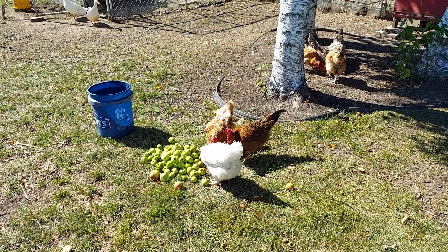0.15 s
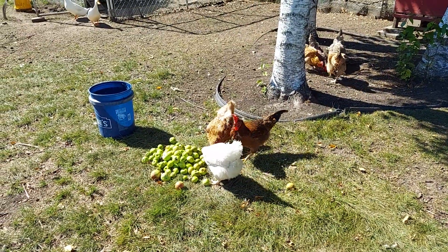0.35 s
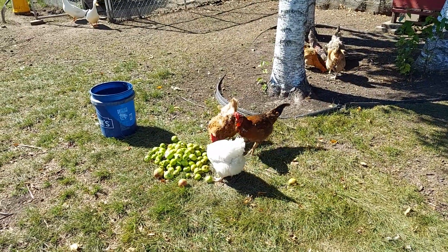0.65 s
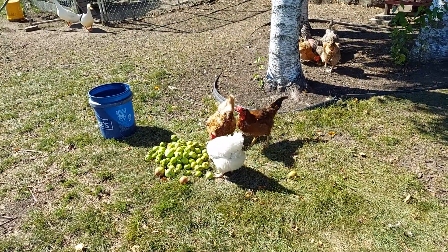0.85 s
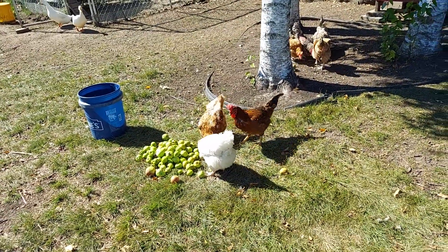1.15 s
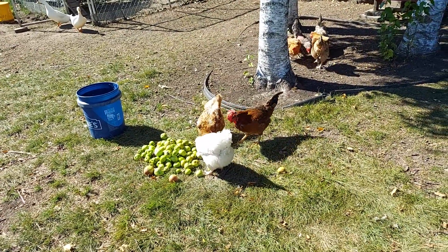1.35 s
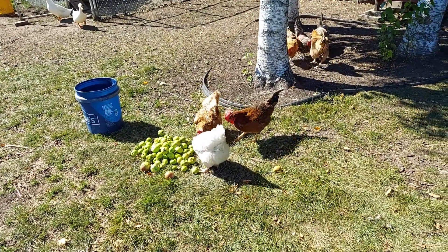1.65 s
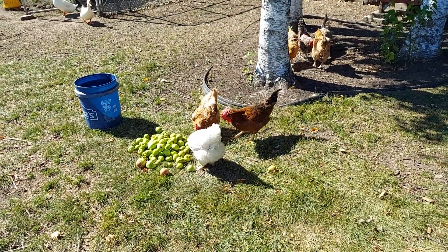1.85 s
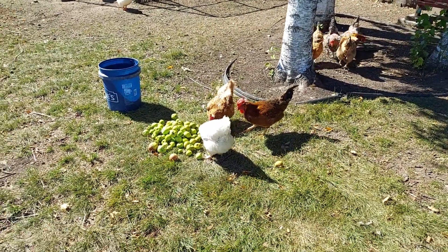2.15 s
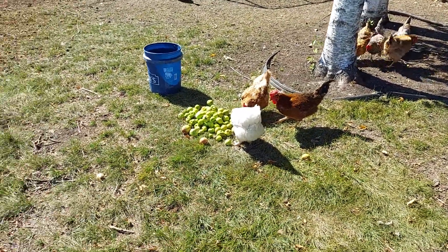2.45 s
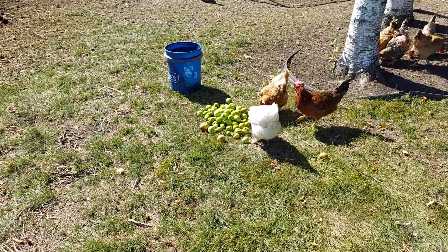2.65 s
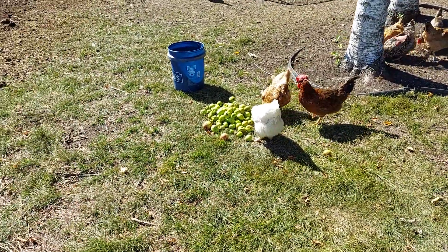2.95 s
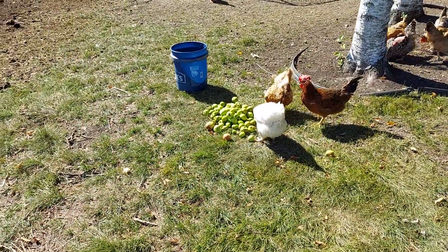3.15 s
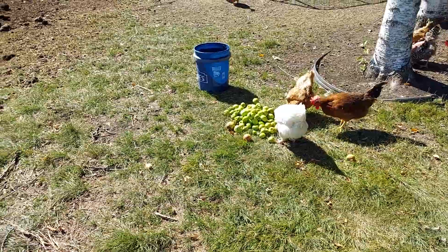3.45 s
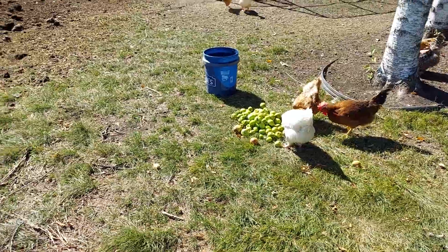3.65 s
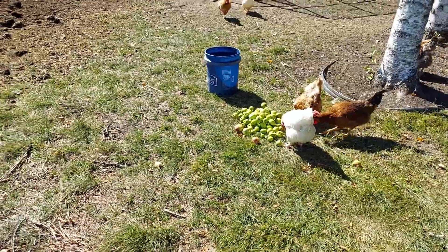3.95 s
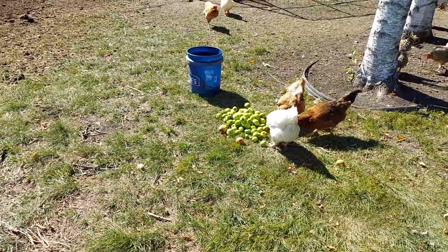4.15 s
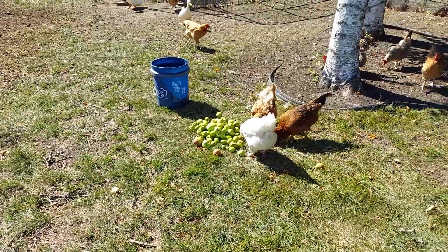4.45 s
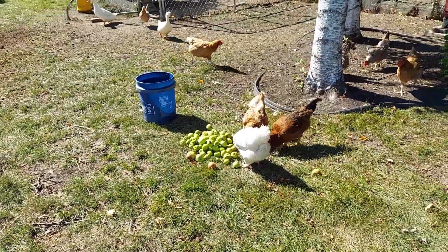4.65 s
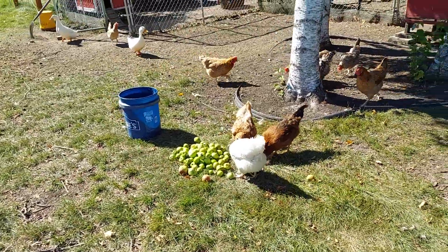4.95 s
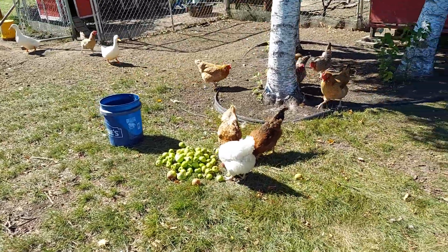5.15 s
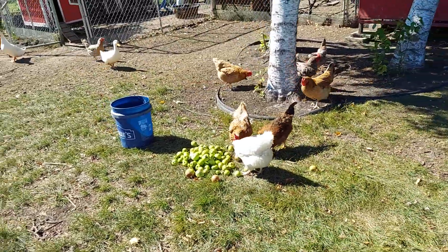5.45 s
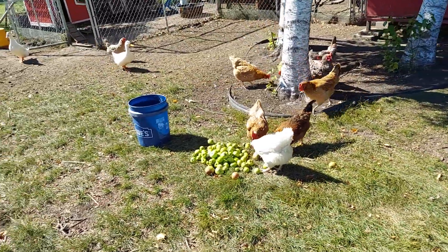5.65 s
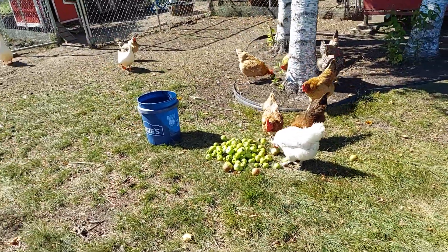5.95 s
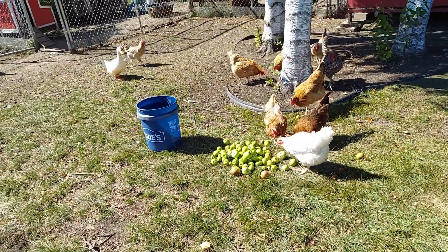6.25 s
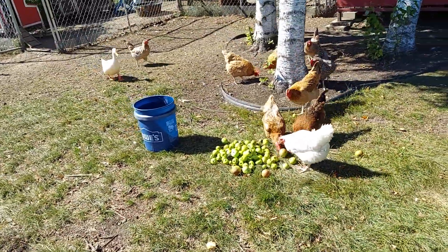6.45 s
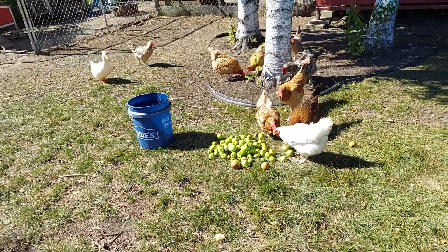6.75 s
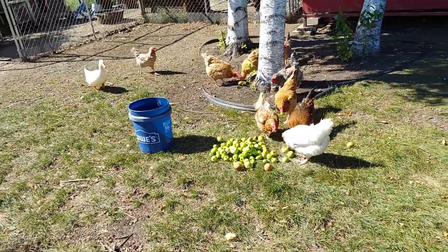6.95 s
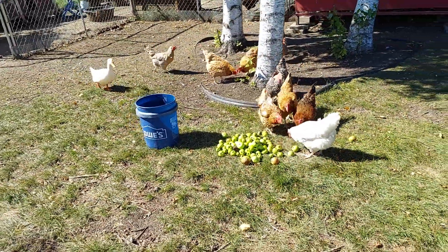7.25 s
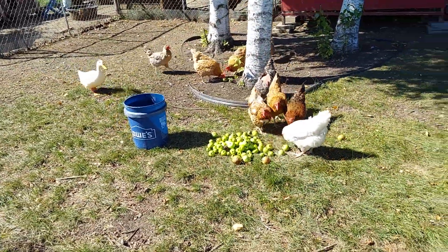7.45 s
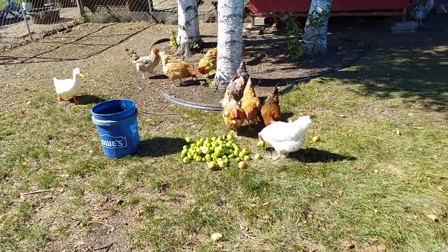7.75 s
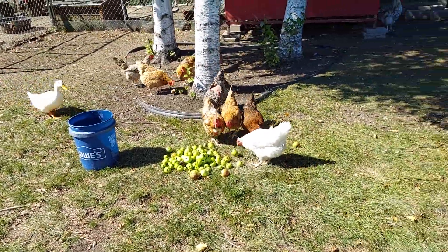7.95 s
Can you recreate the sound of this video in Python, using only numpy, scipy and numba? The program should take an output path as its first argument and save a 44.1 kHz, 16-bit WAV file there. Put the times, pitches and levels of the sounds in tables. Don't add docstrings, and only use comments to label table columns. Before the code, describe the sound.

Backyard poultry: a rooster's crow breaks off, wire fence rattles, then pecking, scratching and a drake's rough, wheezy quacks amid insects and faint traffic.

```python
import sys
import numpy as np
from scipy import signal
from scipy.fft import rfft, irfft, next_fast_len
from scipy.io import wavfile
from scipy.ndimage import map_coordinates
from numba import njit

SR = 44100
rng = np.random.default_rng(int(sys.argv[2]) if len(sys.argv) > 2 else 0)


def transcribe(u):
    v = np.clip(np.atleast_2d(u).T, -1, 1)
    q = np.round(v * 32767).astype(np.int16)
    wavfile.write(sys.argv[1], SR, q)


def attenuation_scalar(level_db):
    decades = np.asarray(level_db, float) / 20
    return 10 ** decades


N = 357430
T = np.arange(N) / SR


def unit(x):
    return x / np.sqrt(np.mean(x ** 2) + 1e-20)


def along(points, hz):
    f, v = np.transpose(points)
    return np.interp(np.log(hz + 1), np.log(f + 1), v)


def curves(rows):
    s, *cols = np.transpose(rows)
    return [np.interp(T, s, c) for c in cols]


def wobble(rate):
    knots = rng.standard_normal(int(N * rate / SR) + 4)
    return map_coordinates(knots, [T * rate])


def filtered(x, response):
    m = next_fast_len(N + 8192)
    return irfft(rfft(x, m) * response(np.fft.rfftfreq(m, 1 / SR)), m)[..., :N]


def modes(table):
    def response(f):
        total = 0
        for k, (hz, width_hz, db) in enumerate(table):
            damping = 1j * f * width_hz
            total = total + (-1) ** k * attenuation_scalar(db) * damping / (hz * hz - f * f + damping)
        return total
    return response


def rush(spectrum, alike, grain_db=0):
    z = rng.standard_normal((2, N)) * attenuation_scalar(grain_db * wobble(900))
    closed = [(spectrum[0][0] / 2, -60)] + list(spectrum) + [(spectrum[-1][0] * 2, -60)]
    mid, side = filtered(z, lambda hz: attenuation_scalar(along(closed, hz)))
    turn = np.arccos(np.clip(alike, -1, 1)) / 2
    mid, side = np.cos(turn) * mid, np.sin(turn) * side
    return unit(np.array([mid + side, mid - side]))


def leaning(left_over_right_db):
    return np.array([[.5], [-.5]]) * left_over_right_db


def placed(x, lead_ms, pan_db):
    shift = lead_ms * SR / 2000
    ears = [map_coordinates(x, [np.arange(N) + side * shift], order=3) * attenuation_scalar(side * pan_db / 2)
            for side in (1, -1)]
    return np.array(ears)


def add(track, s, sound):
    part = track[..., round(s * SR):][..., :sound.shape[-1]]
    part += sound[..., :part.shape[-1]]


# frequency in Hz, time to fall 60 dB in seconds.
YARD_DECAY = [(300, 0.32), (2000, 0.14), (8000, 0.078)]


def yard(x):
    hz, t, z = signal.stft(rng.standard_normal((2, SR // 2)), SR, nperseg=256)
    decay = attenuation_scalar(-60 * t / along(YARD_DECAY, hz)[:, None])
    tail = signal.istft(z * decay, SR, nperseg=256)[1]
    late = np.pad(x, (300, 0))[None]
    return signal.fftconvolve(late, tail / np.linalg.norm(tail[0]), axes=1)[:, :N]


@njit
def ring(x, turn, keep):
    y = np.zeros(len(x))
    for i in range(2, len(x)):
        y[i] = x[i] - x[i - 2] + 2 * keep * np.cos(turn[i]) * y[i - 1] - keep * keep * y[i - 2]
    return y


def resonate(x, hz, width_hz):
    for spread in (1, 2, 2):
        x = ring(x, 2 * np.pi * hz / SR, np.exp(-np.pi * spread * width_hz / SR))
    return unit(x)


def quack(s, length, db, top_hz, soft_db):
    t = np.linspace(0, length, 24)
    effort = np.sin(np.pi / 2 * np.clip(t / (0.75 * length), 0, 1)) ** 2
    start = np.clip(1 - t / 0.075, 0, 1)
    end = np.clip(1 - (length - t) / 0.049, 0, 1)
    level_db = db - 10 * (1 - effort) - 9.5 * start - 16.5 * end
    rate_hz = top_hz - 23 * (1 - effort)
    opening = 0.68 * np.clip(t / (0.85 * length), 0, 1) ** 0.75 * (1 - 0.3 * end)
    bill_shut = np.clip(1 - t / 0.052, 0, 1) ** 0.38
    bill_db = soft_db + (-2.5 - soft_db) * effort ** 2.5 - 22 * end - 20 * bill_shut
    return list(zip(s + t, level_db, rate_hz, opening, bill_db))


def grunt(s, length, db, opening, bill_db):
    rate_hz = 59.13 + 85 * length
    shape = ((-.12, -15.5, 0.25, -2), (.25, 3.5, 0.91, -1.5), (.7, 0.5, 1, -1.5), (1, -41, 0.38, -5))
    return [(s + part * length, db + drop_db, rate_hz, opening * wide, bill_db + shut_db)
            for part, drop_db, wide, shut_db in shape]


# start in seconds, length in seconds, level in dB, throat opening 0-1, bill band in dB.
DRAKE_GRUNTS = [(2.465, .057, -60, 0.42, -33), (2.707, 0.076, -56.5, 0.47, -8),
                (2.875, 0.093, -61.5, 0.42, -4.5), (3.142, 0.09, -55.5, 0.48, -0.5),
                (3.35, 0.065, -58.5, 0.28, -0.5), (3.589, 0.09, -55, 0.28, 0.5),
                (3.925, .11, -58.5, 0.32, -3), (4.08, 0.29, -56, 0.3, -1), (4.487, 0.077, -57, 0.37, -9),
                (4.705, 0.1, -52, 0.54, -6), (5.13, 0.065, -52.5, 0.49, -8),
                (5.634, 0.11, -49.5, 0.49, -21), (6.124, .09, -47, 0.51, -18),
                (6.255, 0.12, -55.5, 0.26, -7), (6.803, .016, -51, 0.52, -17),
                (6.911, 0.069, -50.5, 0.31, -4.5), (7.114, 0.16, -71, 0.83, 0),
                (7.447, 0.073, -57, 0.06, -8.5)]
# start in seconds, length in seconds, top level in dB, top pulse rate in Hz,
# bill band at the start in dB.
DRAKE_CALLS = [
    (5.254, 0.35, -44, 98, -3),
    (6.39, 0.34, -40.5, 98.35, -2.5),
    (7.549, .42, -44, 93.04, -9),
]
# Hz when closed, Hz when open, width in Hz.
DRAKE_THROAT = [
    (1296, 1600, 164),
    (1502, 1943, 235),
    (1644, 2172, 154),
]
# frequency in Hz, width in Hz, level in dB.
DRAKE_HISS = [(2660, 300, 0), (3520, 330, -2), (3950, 400, -1), (4600, 1000, -3.5)]
# time in seconds, left lead in ms, left over right in dB.
DRAKE_WALK = [
    (2.5, 0.0096, -5.5),
    (4.7, 0.12, -4.5),
    (5.4, 0.32, -8),
    (6.5, 0.32, -6.5),
    (7.8, 0.34, -9.5),
]


def drake():
    calls = sorted([grunt(*row) for row in DRAKE_GRUNTS] + [quack(*row) for row in DRAKE_CALLS])
    level_db, rate, opening, bill_db = curves([row for call in calls for row in call])
    sounding = sum(np.interp(T, [c[0][0] - .004, c[0][0], c[-1][0], c[-1][0] + 0.0034], [0, 1, 1, 0])
                   for c in calls)

    cycle = np.cumsum(rate * (1 + .028 * wobble(60))) / SR
    snap = np.diff(np.floor(cycle), prepend=0) * attenuation_scalar(2.3 * wobble(80))
    rasp = unit(rng.standard_normal(N) * np.exp(1.1 * np.cos(2 * np.pi * (cycle - .15))))
    puffs = unit(snap + .35 * np.roll(snap, round(.0031 * SR))) + .6 * rasp

    bands = []
    for (closed_hz, open_hz, width_hz), curve, wander in zip(DRAKE_THROAT, (1, 1, .2), (.02, .022, .006)):
        hz = closed_hz + (open_hz - closed_hz) * opening.clip(0) ** curve
        bands.append(resonate(puffs, hz * (1 + wander * wobble(22)), width_hz))
    low, middle, bill = bands
    middle, bill = np.roll(middle, round(.0012 * SR)), np.roll(bill, round(.003 * SR))

    hiss_shape = lambda f: modes(DRAKE_HISS)(f) ** 2 * np.abs(np.tanh((f - 3050) / 260))
    hiss = attenuation_scalar(bill_db - 20.5 + 13.7 * opening) * unit(filtered(rasp, hiss_shape))

    gain = attenuation_scalar(level_db + 6.0) * sounding
    rest = np.sqrt(np.clip(1 - attenuation_scalar(2 * bill_db), .15, 1))
    throat = gain * rest * (attenuation_scalar(2.5 - 13.2 * opening) * low - middle)
    beak = gain * (attenuation_scalar(bill_db) * bill + hiss)
    lead_ms, pan_db = curves(DRAKE_WALK)
    direct = placed(throat, lead_ms, pan_db) + placed(beak, lead_ms + .065, pan_db)
    return direct + attenuation_scalar(-13.5) * yard(throat + beak)


# time in seconds, pitch in Hz, level in dB.
CROW_FALL = [
    (0, 670, -39.5),
    (.05, 662.4, -34.5),
    (.09, 651, -32.5),
    (.122, 630, -36),
    (.15, 616, -35.5),
    (.18, 571, -41),
    (.23, 502, -47),
]
# multiple of the pitch, level in dB, slope in dB per second.
CROW_HARMONICS = [(1, -3, 8), (2, 2, -48), (3, -42, 140), (4, -25.5, -67), (6, -32, -20)]


def rooster():
    hz, db = curves(CROW_FALL)
    crack = np.interp(T, [.15, .2], [.004, .07])
    phase = 2 * np.pi * np.cumsum(hz * (1 + crack * wobble(151.6))) / SR
    tone = np.zeros(N)
    for k, level, slope_db in CROW_HARMONICS:
        harmonic_db = level + slope_db * T.clip(0, .25) + 0.35 * k * wobble(73.5)
        tone += np.sqrt(2) * attenuation_scalar(harmonic_db) * np.sin(k * phase)
    throat = modes([(296, 85, 3.5), (1140, 600, 1.0), (1790, 440, -5.5), (2880, 180, -7.5)])
    croak = unit(filtered(rng.standard_normal(N), throat))
    voice = tone + np.interp(T, [.13, .19], [.05, .6]) * croak
    voice = voice * attenuation_scalar(db) * np.interp(T, [.21, .24], [1, 0])
    return placed(voice, -0.44, -3.5) + attenuation_scalar(-9.0) * yard(voice)


# start in seconds, length in seconds, pitch in Hz, glide as a share of pitch, level in dB.
HEN_CLUCKS = [(0.176, 0.031, 416, 0.027, -56.5), (0.381, 0.046, 421, 0.14, -63.5),
              (0.482, 0.031, 426, -0.39, -66), (4.731, 0.047, 418, 0.22, -64),
              (4.735, 0.0443, 681, -0.237, -57.5), (4.74, .04, 1120, -.2, -66),
              (4.865, .03, 520, -.15, -67), (6.935, .02, 620, -.4, -60), (5.518, 0.051, 229.2, -0.46, -60)]
# start in seconds, length in seconds, pitch in
# Hz, level in dB, overtone level in dB.
HEN_COOS = [(0.21, 0.021, 1315, -59.5, -35), (0.307, 0.2, 1003, -67, -18), (0.591, 0.052, 650, -71, -9),
            (1.16, 1, 444.6, -76, -6), (2.429, 0.32, 260, -73, -5.5), (2.8, 0.82, 437, -78, -1),
            (3.06, 0.0077, 357, -60, -5), (3.999, 1.74, 440.4, -75.5, -7), (5.8, 0.25, 72.15, -60, -10),
            (6.579, 0.038, 248.6, -66, -2), (7.815, 0.027, 628.5, -61, 2.5)]


def hens():
    out, flutter = np.zeros(N), wobble(90)
    notes = [(*row, -10) for row in HEN_CLUCKS]
    notes += [(s, length, hz, 0, db, over_db) for s, length, hz, db, over_db in HEN_COOS]
    for s, length, hz, glide, db, over_db in notes:
        u = np.linspace(0, 1, round(length * SR))
        bend = 1 + glide * u + .035 * flutter[round(s * SR):][:len(u)]
        phase = 2 * np.pi * np.cumsum(hz * bend) / SR
        swell = np.sqrt(np.sin(np.pi * u).clip(0))
        add(out, s, attenuation_scalar(db + 16) * swell * (np.sin(phase) + attenuation_scalar(over_db) * np.sin(2 * phase)))
    return placed(out, 0, -0.61) + attenuation_scalar(-7.5) * yard(out)


# start in seconds, length in seconds, Hz at the start, Hz at the
# end, level in dB.
DUCK_SQUAWKS = [(3.915, .03, 2330, 2260, -50), (3.925, .03, 1350, 1400, -56), (3.952, .022, 1750, 1850, -50),
                (3.965, 0.042, 2180, 2730, -50), (4.05, 0.026, 2090, 2250, -61),
                (4.08, 0.044, 2040, 2650, -53.5), (4.16, .02, 2200, 2500, -58)]


def yelps():
    out, breath = np.zeros(N), rng.standard_normal(N) * attenuation_scalar(4.6 * wobble(140))
    for s, length, from_hz, to_hz, db in DUCK_SQUAWKS:
        u = np.linspace(0, 1, round(length * SR))
        note = resonate(breath[round(s * SR):][:len(u)], from_hz + (to_hz - from_hz) * u, 263)
        add(out, s, attenuation_scalar(db) * np.sqrt(np.sin(np.pi * u ** 0.51).clip(0)) * note)
    return placed(out, -0.43, -1) + attenuation_scalar(-1.0) * yard(out)


# time in seconds, level in dB, time to fall 60 dB in seconds, brightness in dB.
FENCE_BUMPS = [
    (1.86, -43.5, 0.79, 4),
    (2.53, -46, 0.36, -5.5),
    (2.65, -52, 1, -2.5),
    (3.172, -54.5, 0.91, -8.5),
    (3.918, -49.5, 1, -12.5),
]
# frequency in Hz, width in Hz, level in dB.
FENCE_WIRE = [(1570, 330, -4), (2056, 350, 14), (4220, 660, 1), (4840, 800, -5.5), (7000, 1560, -4.5),
              (8140, 1700, -5), (12700, 2100, -11.5)]


def fence():
    t = np.arange(SR) / SR
    rise = 1 - np.exp(-t / 0.00043)
    slow, middle, quick = np.zeros((3, N))
    for s, db, t60, bright_db in FENCE_BUMPS:
        add(slow, s, attenuation_scalar(db - 60 * t / t60) * rise)
        add(middle, s, attenuation_scalar(db + bright_db - 60 * t / (0.86 * t60)) * rise)
        add(quick, s, attenuation_scalar(db + bright_db - 60 * t / (0.27 * t60)) * rise)
    strands = rng.standard_normal(800)

    def buzz(table):
        comb = lambda f: attenuation_scalar(3 * np.interp(f / 22, np.arange(len(strands)), strands))
        shaking = rng.standard_normal(N) * attenuation_scalar(0.24 * wobble(300))
        return unit(filtered(shaking, lambda f: modes(table)(f) * comb(f)))

    wire = slow * buzz(FENCE_WIRE[:2]) + middle * buzz(FENCE_WIRE[2:3])
    wire = wire + attenuation_scalar(7.0) * quick * buzz(FENCE_WIRE[3:])
    return placed(wire, -0.477, -6.0) + attenuation_scalar(1.5) * yard(wire)


# time in seconds, peak in dB, low part in dB, left over right in dB.
BEAK_CLICKS = [(1.8629, -20, -10, 5), (2.1209, -46, -16, -0.5), (2.2308, -23.5, -13, 2),
               (2.6548, -27.5, -11, -0.5), (2.7286, -40, -16, -1.0), (3.5395, -35, -13, 1.5),
               (3.956, -38, -16, 0.0), (4.0866, -22.5, -26, 1), (4.1193, -31, -16, 3.5),
               (4.2218, -33, -16, -1), (4.2809, -32, -13, 3.5), (4.357, -27.5, -8, 3.0),
               (4.3888, -25.5, -14, 8), (4.6041, -34, -16, 0.5), (4.6352, -31, -18, -6),
               (5.1627, -32, -26, 7), (5.2945, -27, -10.5, 3), (5.4184, -24, -19, -3.5),
               (5.4475, -33, -18, -2), (5.4711, -25, -18, -11), (5.7246, -29, -17, 0.5),
               (5.8039, -36, -16, 0.5), (5.8677, -10.5, -10, -4.5), (5.99, -30, -10, -5),
               (6.0209, -41, -18, -2), (6.0425, -33, -11, -8), (6.1307, -27, -19, -1),
               (6.7696, -35, -16, 2.5), (6.8015, -25, -22, 5), (6.8872, -22, -22, -2),
               (6.9055, -28, -24, 0.5), (6.9738, -29, -25, 6), (7.3832, -35.5, -18, 5),
               (7.5692, -32, -10, 8), (7.5853, -29, -17, -5), (7.6117, -43, -20, 0.5),
               (7.6776, -17.5, -20.5, 0), (7.73, -30, -16, 1.0), (7.7707, -42, -16, 3.5),
               (7.8738, -14.5, -14, 5), (7.8937, -30, -18, 8), (7.9879, -31, -14, 3.5),
               (8.0636, -25.5, -16, 2)]
MORE_CLICKS = [(0.7701, -42, -42, 3.0), (5.8800, -14, -12, 3), (5.9098, -20.5, -4, -1),
               (5.9267, -17, -15, -3), (5.9336, -11.5, -10.5, 1.5), (5.9434, -26, -10.5, 3),
               (.4185, -52, 3, -6), (6.0929, -32, -14, -1), (7.2998, -53, -6, -2)]
NEARBY_CLICKS = [(4.2985, -33, -14, 2), (4.4295, -34, 0, 0), (4.475, -35, -16, 2), (4.521, -31, -14, 2),
                 (5.7542, -35, 3, 2), (5.8475, -32, -5, 4), (5.9135, -30, -12, 0), (5.9155, -23, -9, 0),
                 (5.9412, -30, -7, 0), (6.055, -30, -20, -1), (6.1403, -30, -16, -3),
                 (6.8085, -29.5, -4.5, -3), (6.8142, -26, -12, 2), (6.8815, -25, -24, 0),
                 (6.9005, -25, -20, 0), (6.916, -40, -14, 0), (6.9222, -29, -18, 0), (6.937, -35, -14, 0),
                 (7.578, -36, -22, 0), (7.628, -44, -24, 0), (7.65, -39, -22, 0), (7.664, -41, -20, 0),
                 (7.7955, -36, 0.5, -2), (7.88, -28, -16, 0), (8.09, -31, -16, 0)]
# time in seconds, peak in dB.
FRUIT_KNOCKS = [(3.832, -41.5), (5.9343, -22), (5.989, -33), (6.08, -41.5), (6.688, -38), (5.868, -31.5),
                (6.907, -39.5), (6.975, -37), (7.017, -38), (7.873, -41), (8.046, -33.5), (8.06, -35)]


def pecks():
    out, t = np.zeros((2, N)), np.arange(SR // 50) / SR
    edge = signal.butter(2, 8000, "high", fs=SR, output="sos")
    body = signal.butter(1, [1400, 6500], "band", fs=SR, output="sos")
    decay = attenuation_scalar(-60 * t / 0.0023) + 0.3 * attenuation_scalar(-60 * t / 0.016)
    for s, db, low_db, pan_db in list(BEAK_CLICKS) + list(MORE_CLICKS) + list(NEARBY_CLICKS):
        burst = (rng.standard_normal(len(t)) + 1.75 * rng.standard_normal((2, len(t)))) * decay
        dull = attenuation_scalar(low_db + 3.5 + leaning(-11.5)) * signal.sosfilt(body, burst)
        click = signal.sosfilt(edge, burst) + dull
        click = click / np.abs(click.mean(axis=0)).max()
        add(out, s + .0007, attenuation_scalar(db + 3.5 + leaning(pan_db)) * click)
    tap = np.sin(2 * np.pi * 550 * t) * attenuation_scalar(-60 * t / 0.0075)
    tap += 2.2 * np.sin(2 * np.pi * 1100 * t) * attenuation_scalar(-60 * t / 0.002)
    for s, db in FRUIT_KNOCKS:
        add(out, s, attenuation_scalar(db) * tap)
    return out


# start in seconds, hold in seconds, level in dB, stalks under blades in dB.
GRASS_RAKES = [(0.502, 0.011, -62.5, -3), (1.894, 0.18, -56.5, 0.5), (2.123, 0.38, -57.5, -5.5),
               (2.547, 0.18, -58, 1), (2.78, 0.29, -70, 3.5), (3.27, 0.089, -61, -2),
               (3.618, 0.19, -62.5, -6), (3.981, 0.096, -47.5, -4), (4.143, 0.059, -39, -14),
               (4.26, 0.22, -43, -15.5), (4.568, 0.11, -51.5, -9.5), (4.736, 0.052, -54.5, -7),
               (4.868, 0.21, -53.5, -8), (5.065, 0.03, -37.5, -10.5), (5.18, 0.14, -50.5, -11),
               (5.349, 0.069, -47, -9.5), (5.448, 0.014, -41, -8), (5.541, 0.18, -57, -8),
               (5.823, 0.064, -45, -5), (5.906, 0.045, -41.5, -12), (6.009, 0.19, -46.5, -11.5),
               (6.321, 0.43, -63.5, -2.5), (6.81, .005, -46, -9), (6.917, 0.0055, -44, -9),
               (7.004, 0.049, -56, -8), (7.578, 0.097, -55, -7.5), (7.699, 0.066, -55.5, -5),
               (7.892, 0.014, -39, -13.5), (8, 0.049, -44, -9.5), (8.05, 0.049, -44.5, -9)]


def raking():
    s, hold, db, stalk_db = np.transpose(GRASS_RAKES)[..., None]
    stir_db, rise_db_per_s, fall_db_per_s = -67, 274, 176
    t = T[::64]
    level_db = db - rise_db_per_s * np.clip(s - t, 0, None) - fall_db_per_s * np.clip(t - s - hold, 0, None)
    blades = attenuation_scalar(2 * stir_db) + attenuation_scalar(2 * level_db).sum(axis=0)
    stalks = attenuation_scalar(2 * (stir_db - 17)) + attenuation_scalar(2 * (level_db + stalk_db)).sum(axis=0)
    return np.sqrt(np.interp(T, t, blades)), np.sqrt(np.interp(T, t, stalks))


# frequency in Hz, level in dB per Hz.
GRASS_BLADES = [(1500, -37), (3500, -20.5), (6000, -13), (10000, -1), (13000, 1.5), (15800, -3.5)]
GRASS_STALKS = [(300, -3.5), (1200, 0.5), (2500, -4.5), (4500, -4), (7000, -7), (10000, -56)]


def grass():
    blades, stalks = raking()
    snaps = (rng.random(N) < 51 / SR) * attenuation_scalar(-4 + 6.9 * rng.standard_normal((2, N)))
    burst = rng.standard_normal((2, 128)) * attenuation_scalar(-60 * np.arange(128) / SR / .004)
    crackle = rush(GRASS_BLADES, .05, grain_db=3.5)
    crackle = crackle + signal.fftconvolve(snaps, np.diff(burst), axes=1)[:, :N]
    bright = blades * attenuation_scalar(1 + 1.5 * wobble(25) + leaning(2.6)) * crackle
    return bright + stalks * attenuation_scalar(5.5) * rush(GRASS_STALKS, 0.087, grain_db=2.5)


# time in seconds, peak in dB.
CRICKET_PAIRS = [(.0623, -48.5), (.4164, -51.5), (.7766, -54), (1.3359, -55.5), (1.6062, -57),
                 (2.0344, -50), (2.4544, -51), (3.0384, -53), (4.3634, -47.5), (5.011, -47), (6.3744, -52),
                 (6.7774, -51.5), (7.1624, -54), (7.4934, -54), (7.8286, -55)]
# time in seconds, peak in dB.
CRICKET_FALSE_STARTS = [(1.295, -68), (1.565, -64), (4.316, -50), (4.968, -58)]


def cricket():
    out, u = np.zeros((2, N)), np.linspace(0, 1, round(0.0292 * SR))
    swell = np.sin(np.pi * u ** 1.5) ** .7 * (.45 + .55 * u)
    for (s, db), (tune, gain) in zip(CRICKET_PAIRS, rng.standard_normal((len(CRICKET_PAIRS), 2))):
        hz = 5200 + 30 * tune - 1650 * (u - .4) ** 2
        stroke = swell * np.sin(2 * np.pi * np.cumsum(hz) / SR)
        sides = attenuation_scalar(db + leaning(7))
        add(out, s + .0305 - .045, sides * attenuation_scalar(gain) * stroke)
        add(out, s + 0.027, sides * attenuation_scalar(2.5) * stroke)
    for s, db in CRICKET_FALSE_STARTS:
        add(out, s, attenuation_scalar(db) * u ** 3 * 2 * stroke)
    out += attenuation_scalar(-13) * np.roll(out[::-1], round(0.0184 * SR), axis=1)
    out[1] = np.roll(out[1], round(0.00061 * SR))
    return out


def singer(rate, s, hz, sweep_hz, sharp):
    stroke = 2 * np.pi * (rate * (T - s) + 0.037 * wobble(0.99))
    phase = 2 * np.pi * np.cumsum(hz + sweep_hz * np.cos(stroke - .4)) / SR
    fuzz = np.array([wobble(500) * np.cos(phase) + wobble(500) * np.sin(phase) for ear in range(2)])
    return unit(np.exp(sharp * (np.cos(stroke) - 1)) * fuzz)


# time in seconds, level in dB.
KATYDID_LEVEL = [
    (0.0, -50),
    (1.76, -53),
    (5.77, -49.5),
    (7.53, -50),
    (8.1, -46.5),
]


def katydids():
    far = rush([(7200, -23.5), (7800, -9.0), (8400, 0.5), (9000, -5.0), (9400, -20.5)], 0.046)
    near = 0.7 * singer(18.66, .028, 8500, 426, 2.4) + .5 * singer(18.0, 0.0096, 8500, -350, 1.0)
    return attenuation_scalar(curves(KATYDID_LEVEL)[0] + np.array([[2.2], [-2.6]])) * unit(far + near)


def truck(s, span, hz, width_hz, db):
    whine = filtered(rng.standard_normal(N), lambda f: modes([(hz, width_hz, 0)])(f) ** 2)
    return attenuation_scalar(db - 6.2 * ((T - s) / span) ** 2) * unit(whine)


# time in seconds, pitch in Hz, level in dB.
MOTOR_HUM = [
    (0.0, 88.76, -46),
    (0.69, 86.7, -48),
    (1.33, 86.97, -42),
    (2.3, 84.1, -59.5),
]
# loudest moment in seconds, half length in seconds, whine in Hz, width in Hz, level in dB.
TRUCKS = [
    (1.38, 0.2, 914, 162, -56),
    (3.17, 0.88, 773, 156, -59),
]
# time in seconds, strength in dB.
TRAFFIC_LEVEL = [(0, -51), (.2, -50), (.88, -55.5), (1.4, -51.5), (2.12, -55), (3.63, -59.5), (4.24, -53),
                 (6.11, -53.5), (6.34, -57), (6.75, -55.5), (7.38, -56.5), (8.1, -54)]
# frequency in Hz, level in dB per Hz.
ROAD_RUMBLE = [(25, -30), (41, -10), (65, 1), (100, -7), (140, -7.5)]
BREEZE_COLOUR = [(90, 1), (130, 0.5), (200, -3), (400, -11)]
TYRE_HISS = [(300, -9.5), (640, -5), (800, -1), (930, -3), (1100, -7), (1500, -10), (2500, -55)]
STILL_AIR = [(1800, 5), (2400, -7.5), (3300, -16), (5000, 2.5), (7000, -8), (10000, -22), (15700, 0)]


def distance():
    hz, db = curves(MOTOR_HUM)
    fade = np.interp(T, [2.2, 2.5], [1, 0])
    hum = np.sqrt(2) * attenuation_scalar(db) * fade * np.sin(2 * np.pi * np.cumsum(hz) / SR)
    rumble_db, = curves(TRAFFIC_LEVEL)
    swing_db = rumble_db - rumble_db.mean()
    gust = np.tanh(wobble(7))
    rumble = attenuation_scalar(rumble_db + 5.1 * gust) * rush(ROAD_RUMBLE, 0.9)
    breeze = attenuation_scalar(-64 + swing_db + 3.0 + 5.5 * gust) * rush(BREEZE_COLOUR, 0.88)
    trucks = attenuation_scalar(gust) * sum(truck(*row) for row in TRUCKS)
    tyres = attenuation_scalar(-58 + 0.69 * swing_db + 0.5 + wobble(8)) * rush(TYRE_HISS, 0.46)
    air = attenuation_scalar(-64.0 + wobble(2.5)) * rush(STILL_AIR, 0)
    return hum + trucks + rumble + breeze + tyres + air


def scene():
    birds = drake() + rooster() + hens() + yelps()
    return birds + fence() + pecks() + grass() + cricket() + katydids() + distance()


def roll_off(x):
    return signal.sosfilt(signal.butter(12, 16960, fs=SR, output="sos"), x)


def record(dry):
    mix = filtered(dry, lambda hz: hz < 15800)
    return roll_off(mix)


dry = scene()
out = record(dry)
transcribe(out)
```